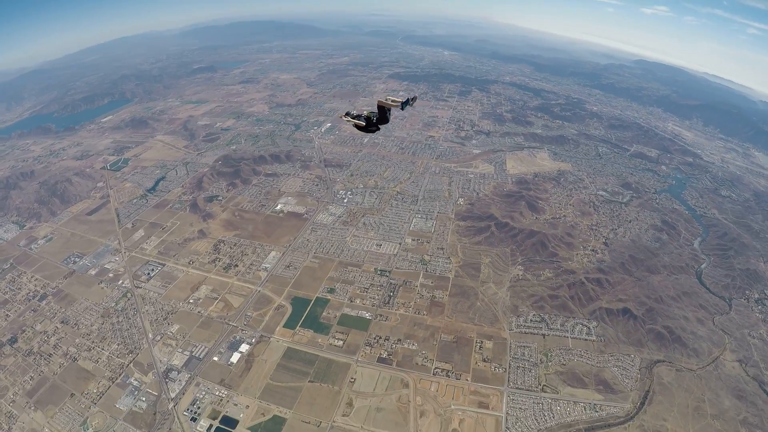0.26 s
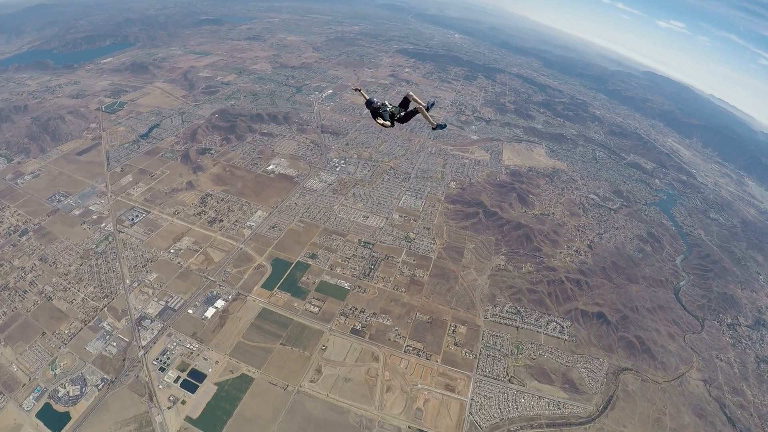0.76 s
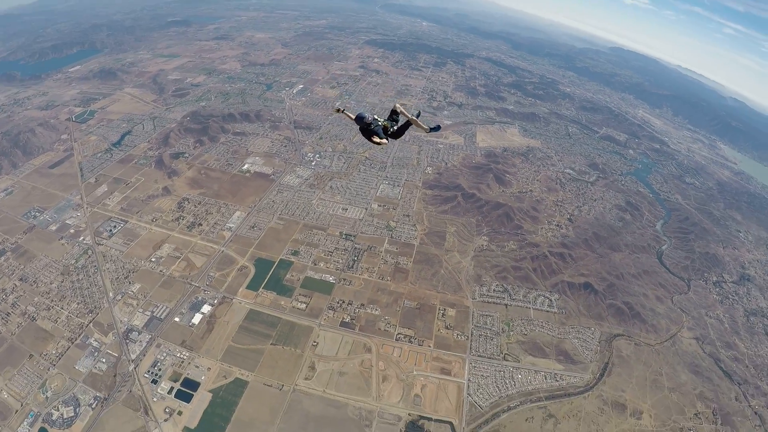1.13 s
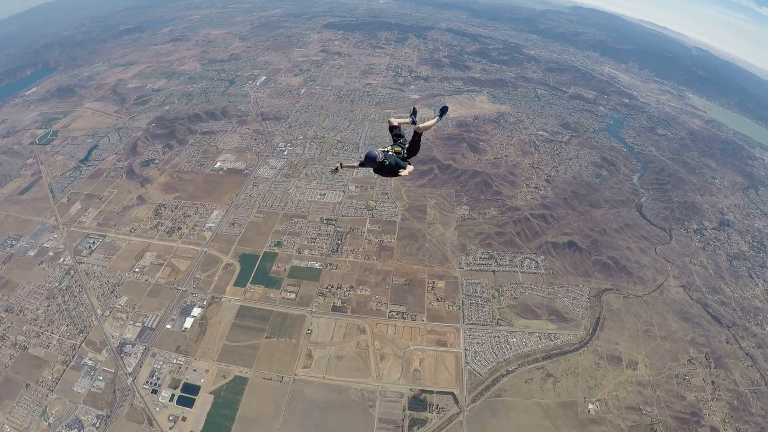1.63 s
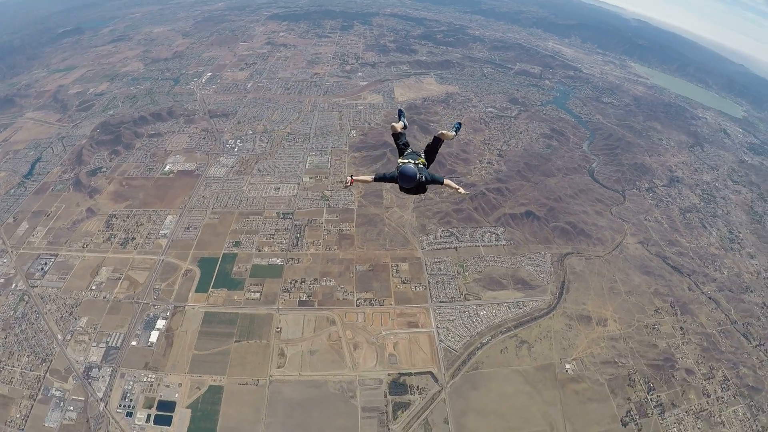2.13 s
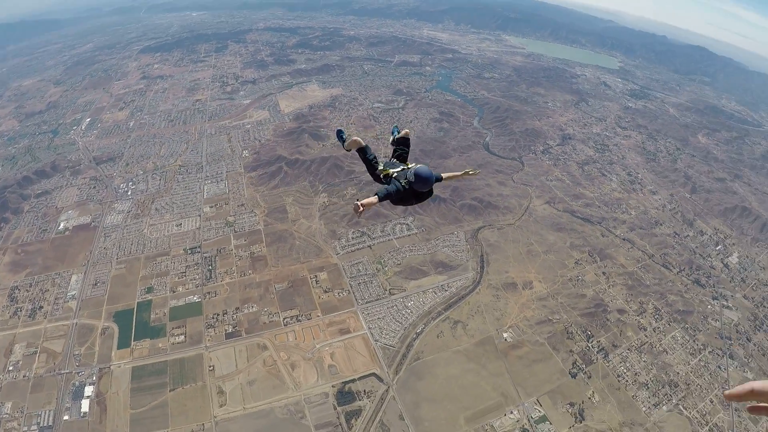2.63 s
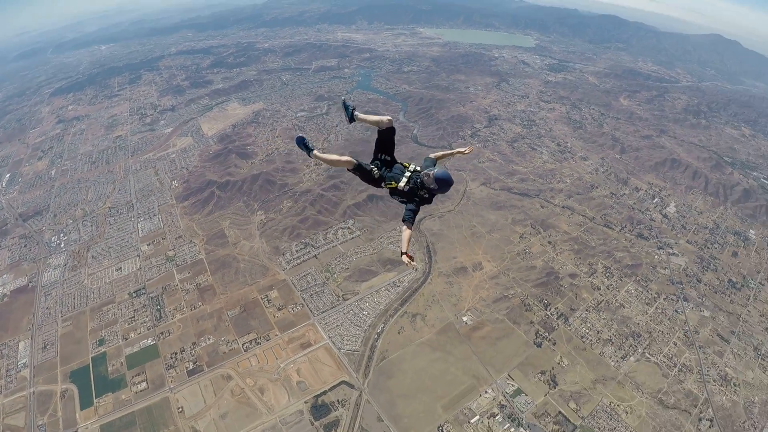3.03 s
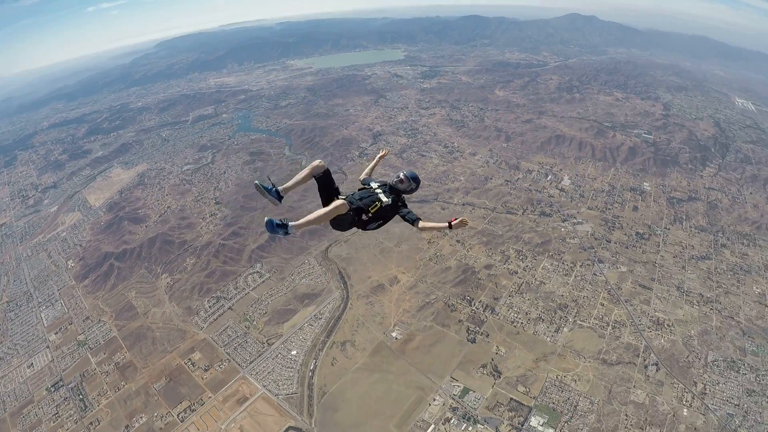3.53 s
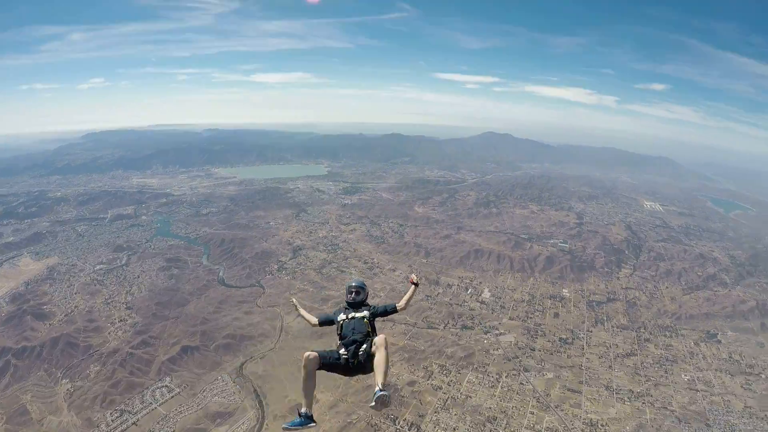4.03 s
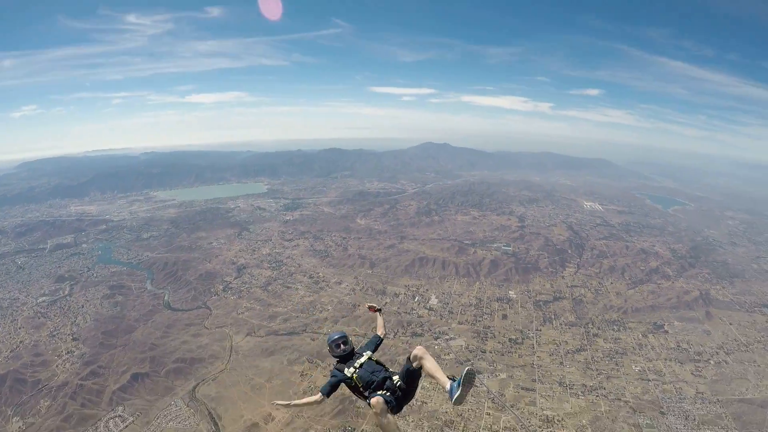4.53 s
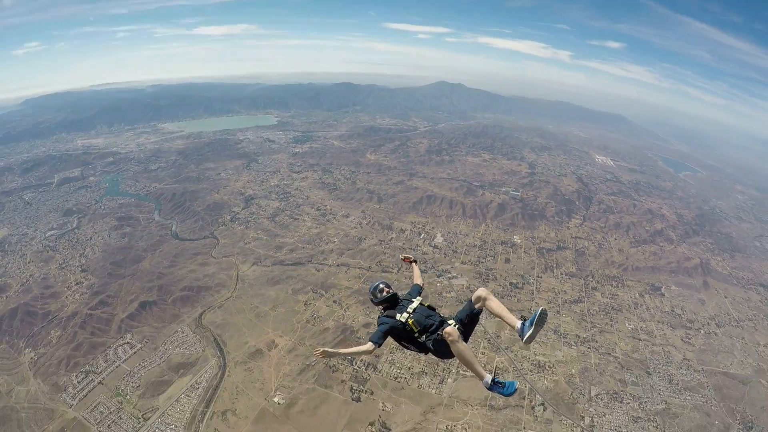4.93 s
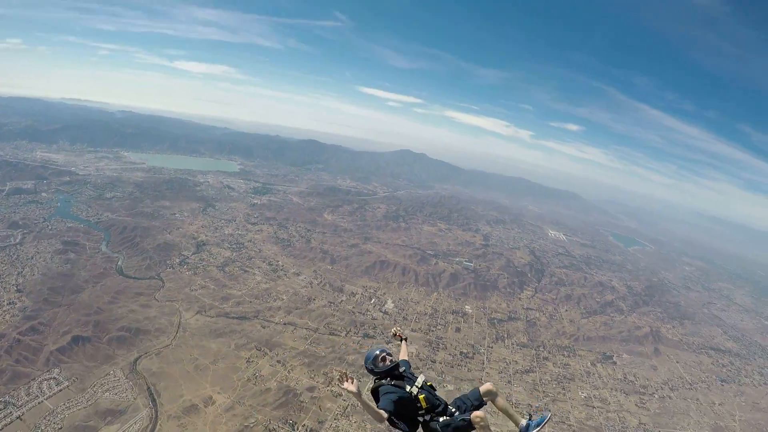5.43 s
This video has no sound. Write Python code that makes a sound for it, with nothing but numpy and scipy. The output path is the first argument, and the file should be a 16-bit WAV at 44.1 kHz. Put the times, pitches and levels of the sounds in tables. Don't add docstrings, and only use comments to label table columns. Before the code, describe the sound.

Freefall wind strikes a small helmet camera microphone at close range, in open sky with no reverberation. From 0 to 1.4 s a dense, steady rush swells over low buffeting, with airy hiss and a faint, unstable whistle around 0.5-1.4 s, nearly buried. From about 1.5 to 3.9 s the blast is fuller and rougher: thumping puffs, sharp little flicks, and rapid dry ticks of a loose strap end against the plastic housing, clustered most thickly around 1.7-2.9 s. Loudest swings sound squeezed and rounded. Near 4.0 s the roar suddenly collapses as the microphone turns out of the stream. A much quieter, duller low flutter remains, interrupted by short uneven gusts and tiny crackles from 4.2 s. Gusts strengthen around 4.9-5.3 s, with ragged gaps between them, then weaken to sparse soft puffs until the end at about 5.7 s.

```python
import sys
import numpy as np
from scipy import signal
from scipy.fft import rfft, irfft, next_fast_len
from scipy.io import wavfile
from scipy.ndimage import uniform_filter1d

SR = 44100
rng = np.random.default_rng(int(sys.argv[2]) if len(sys.argv) > 2 else 0)


def to_wav(sig):
    pcm = np.clip(np.atleast_2d(sig), -1, 1) * 32767
    pcm = np.round(pcm).astype(np.int16)
    wavfile.write(sys.argv[1], SR, pcm.T)


def ratio_of_db(decibels):
    return 10 ** (np.asarray(decibels, float) / 20)


N = 250471
TIME = np.arange(N) / SR
FAST = next_fast_len(N)
HZ = np.maximum(np.fft.rfftfreq(FAST, 1 / SR), 1)

# start in seconds, peak in dB, treble share in dB, length in seconds.
PUFFS_OPEN = [(1.561, -6, -28, 0.0041), (1.673, -9, -29, 0.006), (1.719, -7, -22, 0.0039),
              (2.196, -8, -19, 0.0032), (2.23, -10, -29, 0.0062), (2.642, -19, -26, 0.0024),
              (2.927, -19, -22, 0.0035), (3.07, -11, -32, 0.0046), (3.238, -10.5, -14, 0.012),
              (3.321, -22.5, -25, 0.0049), (3.378, -12, -13.5, 0.006), (3.458, -16.5, -23, 0.012),
              (3.499, -27, -23, 0.006), (3.649, -6, -19, 0.011), (3.793, -22, -26, 0.0026),
              (3.908, -7.5, -18, 0.0042)]
# start in seconds, peak in dB, treble share in dB, length in seconds.
PUFFS_LEE = [(4.208, -21.5, -25, 0.0026), (4.269, -26.5, -20, 0.0039), (4.293, -18, -18, 0.0049),
             (4.47, -18, -31, 0.0063), (4.492, -21.5, -28, 0.0071), (4.513, -11.5, -38, 0.0017),
             (4.568, -29, -24, 0.006), (4.64, -24.5, -22, 0.006), (4.664, -19.5, -29, 0.0044),
             (4.68, -28.5, -28, 0.0071), (4.74, -28, -12, 0.0076), (4.778, -11, -24, 0.0029),
             (4.822, -20, -28, 0.0041), (4.877, -19.5, -19, 0.0051), (4.909, -15.5, -12, 0.0031),
             (4.93, -12, -22, 0.0036), (4.97, -9, -31, 0.0046), (5.049, -13.5, -12, 0.0043),
             (5.086, -16, -32, 0.005), (5.148, -11.5, -32, 0.006), (5.173, -15.5, -21, 0.005),
             (5.216, -20.5, -23, 0.006), (5.237, -15.5, -17, 0.0073), (5.251, -7, -24, 0.0074),
             (5.307, -29.5, -30, 0.0044), (5.332, -16.5, -38, 0.0047), (5.373, -15, -33, 0.0041),
             (5.466, -22, -22, 0.0072), (5.542, -28.5, -24, 0.006), (5.614, -22, -28, 0.0087)]


def unit(x):
    return x / np.sqrt(np.mean(x ** 2))


def curves(table):
    s, *columns = np.transpose(table)
    return [np.interp(TIME, s, c) for c in columns]


def between(apart, attached, separated):
    return attached + (separated - attached) * apart


def colour(x, spectrum):
    hz, db = np.transpose(spectrum)
    gain = ratio_of_db(np.interp(np.log(HZ), np.log(hz), db, right=-150))
    return irfft(rfft(x, FAST) * gain, FAST)[:N]


def passed(x, spectrum):
    click = colour(np.arange(N) == 0, spectrum)
    return colour(x, spectrum) / np.sqrt(np.sum(click ** 2))


def walk(rate_hz):
    k = max(int(SR / rate_hz), 2)
    held = rng.standard_normal(4000)[np.arange(N) // k % 4000]
    return unit(uniform_filter1d(uniform_filter1d(held, k), k))


def bells(times_s, db, halves_s):
    coarse = TIME[::32]
    total = sum(d * np.exp(-((coarse - s) / half) ** 2) for s, d, half in zip(times_s, db, halves_s))
    return np.interp(TIME, coarse, total)


def bursts(times_s, db, lengths_s, rise):
    out = np.zeros(N)
    for s, peak_db, length_s in zip(times_s, db, lengths_s):
        i = int(s * SR)
        t = TIME[:min(int(.08 * SR), N - i)] / length_s
        out[i:i + len(t)] += ratio_of_db(peak_db) * (1 - np.exp(-t / rise)) * np.exp(-t ** 2)
    return out


def grain(s, half_s):
    i = np.arange(max(int((s - .012) * SR), 0), min(int((s + .012) * SR), N))
    t = i / SR - s
    return i, t, np.exp(-(t / half_s) ** 2)


def turbulence(spectrum, shared_db, own_db, rate_hz, tilt_db=0., pivot_hz=1000, bend_db=0.):
    whole = rfft(unit(colour(rng.standard_normal(N), spectrum)), FAST)
    half_octave = 2 * np.log2(HZ)
    first, last = (int(2 * np.log2(spectrum[k][0])) for k in (0, -1))
    out = 0
    for step in range(first, last + 2):
        window = np.cos(np.pi / 2 * np.clip(half_octave - step, -1, 1)) ** 2
        piece = irfft(whole * window, FAST)[:N]
        away = step / 2 - np.log2(pivot_hz)
        out = out + piece * ratio_of_db(own_db * walk(rate_hz) + tilt_db * away + bend_db * away ** 2)
    return out * ratio_of_db(shared_db)


def head():
    # time in seconds, exposure in dB, flow separation 0-1, wake strength in dB.
    attitude = [(0, -26.5, 0, 0), (.1, -27, 0.1, -11.5), (.4, -25, 0, -15), (.85, -22.5, 0.05, -17.5),
                (1.4, -19.5, 0.22, -14), (1.7, -21.5, 0.34, -11.5), (2.0, -21, 0.37, -17),
                (2.5, -20.5, 0.34, -12.5), (3.1, -21, 0.2, -11.5), (3.75, -22.5, 0.47, -10),
                (4.0, -29, 0.65, -19), (4.04, -42.5, 0.94, -29.5), (4.18, -43.5, 0.94, -19),
                (4.3, -41.5, 0.94, -23), (4.6, -44, 1, -24.5), (5.0, -29, .8, -14.5),
                (5.3, -35.5, 0.9, -17), (5.5, -46.5, 0.97, -21)]
    exposure_db, apart, wake_db = curves(attitude)
    return exposure_db, np.clip(apart, 0, 1), wake_db


def gusts():
    # centre in seconds, change of exposure in dB, half length in seconds.
    swells = [(1.525, -2.5, 0.027), (1.721, -5, 0.013), (1.799, 5, 0.031), (1.931, 3.5, 0.01),
              (3.62, -3, 0.045), (3.812, -7, 0.023), (4.233, 11.5, 0.026), (4.3, 4, .02), (4.46, 3.5, .06),
              (4.312, 2, .006), (1.615, -1, 0.054), (5.026, 5, 0.016), (5.3, -1, .03), (4.33, 2, 0.0045),
              (4.364, 5, 0.0055), (4.414, 6.5, 0.018), (4.586, 8, 0.0045), (4.619, 6.5, .008),
              (4.68, 13.5, 0.0093), (4.78, 7, 0.0085), (4.837, 10, 0.01), (4.911, 12, 0.021),
              (4.968, 10, 0.0088), (5.076, 10, 0.031), (5.118, 8, 0.0076), (5.173, -24, 0.0071),
              (5.192, 11, 0.011), (5.253, 9, 0.032), (5.359, 9.5, 0.024), (5.42, 8, 0.0046),
              (5.484, 12, 0.0058), (5.569, 12, 0.013), (5.583, 10.5, 0.0047), (5.631, 5, 0.0065),
              (5.68, 16.5, 0.02)]
    # centre in seconds, change of exposure in dB.
    gaps = [(3.96, -5), (4.035, -14), (4.047, -5), (4.077, -8), (4.126, -11), (4.174, -3), (4.306, -3),
            (4.462, -1), (4.658, -1), (4.927, -4), (5.166, -5), (5.212, -4), (5.299, -7), (5.527, -4),
            (4.54, 1), (4.625, 0), (4.71, -8), (4.805, -7), (4.855, -8), (4.896, -11), (4.947, 0),
            (4.99, -6), (5.035, -4), (5.1, -3), (5.135, -10), (5.222, -2), (5.29, 0), (5.315, 1),
            (5.405, 7), (5.45, -7), (5.505, -1), (5.603, -5), (5.65, -0.5)]
    short = [(s, db, 0.0055) for s, db in gaps]
    lulls = [(s - .0045, -2.5, 0.003) for s, *_ in PUFFS_OPEN + PUFFS_LEE]
    return bells(*np.transpose(swells + short + lulls))


def flutter(apart):
    return between(apart, .5, 4) * 1.76 * np.tanh(unit(0.096 * walk(70) + walk(200)) / 1.97)


def buffet(wake_db, gust_db, flutter_db, apart):
    # frequency in Hz, level in dB per Hz.
    slow_colour = [(15, -36), (25, -12), (50, 0), (90, 1.5), (125, 4), (160, -3.5), (220, -24),
                   (300, -75.5)]
    # frequency in Hz, level in dB per Hz.
    quick_colour = [(90, -45), (130, -7.5), (180, 0.5), (240, -4), (320, -8.5), (420, -18.5), (560, -28.5),
                    (800, -36)]
    # centre in seconds, change of slow buffet in dB,
    # change of quick buffet in dB, half length in seconds.
    vortices = [(0.016, -1.5, -14.5, 0.027), (0.493, 1, -0.5, 0.065), (1.167, -1.5, -2.5, 0.082),
                (1.647, 5, -4, .02), (1.772, 6.5, -4, 0.041), (1.933, 3, 3, 0.055), (2.498, -4, -1.5, 0.11),
                (2.775, 3.5, -2.5, 0.075), (2.852, -6, -6, 0.014), (3.067, -3.5, -3.5, 0.029),
                (3.6, -2, 0, 0.066), (3.731, 6, 0.5, 0.022), (3.785, 0.5, 2.5, 0.031), (3.994, 5, 8, 0.062),
                (4.112, -4, -2.5, 0.077), (4.258, 0.5, -0.5, 0.057), (4.5, 4.5, 5, 0.029),
                (4.559, -5, -5, 0.032), (4.723, -7, 0, 0.03), (4.753, 13, 7.5, 0.013),
                (4.841, 5.5, 2, 0.011), (5.11, 0.5, 1.5, 0.016), (5.162, -1.5, 10.5, 0.049),
                (5.315, 3.5, 9.5, 0.026), (5.64, -9.5, -8, 0.024)]
    # time in seconds, lean of quick buffet in dB per octave.
    eddy_size = [(0, 2.5), (.3, 0), (.7, -3), (1.0, -3), (1.3, -6.5), (1.6, 4.5), (1.9, -1), (2.2, 0.5),
                 (2.6, -1.5), (3.0, 3), (3.3, 2.5), (3.55, 3), (3.8, 7), (4.0, 0), (4.4, -0.5), (4.8, -1.5),
                 (5.2, 1.5), (5.68, -6)]
    at_s, slow_swell_db, quick_swell_db, half_s = np.transpose(vortices)
    wake_db = wake_db + 0.42 * gust_db
    slow_db = -12.5 + 0.082 * (wake_db + 10.0) + bells(at_s, slow_swell_db, half_s)
    quick_db = wake_db + bells(at_s, quick_swell_db, half_s)
    slow = ratio_of_db(slow_db) * turbulence(slow_colour, -.15 * flutter_db, 0.43, 4.7)
    tilt_db = between(apart, -1, 1.5) + curves(eddy_size)[0]
    quick = ratio_of_db(quick_db) * turbulence(quick_colour, 0.46 * flutter_db, 0.94, 28, tilt_db, 230)
    return slow + quick


def rush(level_db, flutter_db, apart):
    # frequency in Hz, level in dB per Hz.
    rush_colour = [(200, -47), (350, 0), (500, -0.5), (700, -3), (1200, -5), (1800, -11), (2600, -17.5),
                   (3200, -24.5), (4200, -37), (6000, -39)]
    tilt_db = between(apart, 2.5, -5)
    return ratio_of_db(level_db - 0.5) * turbulence(rush_colour, flutter_db, 0.82, 45, tilt_db, 1160)


def hiss(exposure_db, gust_db, flutter_db, apart):
    # frequency in Hz, level in dB per Hz.
    hiss_colour = [(2500, -28.5), (3400, -3.5), (4100, 1.5), (4600, 2), (5400, 0), (6600, -1.5),
                   (7400, -5.5), (8500, -13.5), (10000, -15), (11200, -24), (12200, -30), (14500, -39.5),
                   (15500, -55.5)]
    level_db = exposure_db + between(apart, -12, -21) + 0.73 * gust_db
    shared_db = between(apart, 0.31, 0.7) * flutter_db + 0.36 * walk(40)
    tilt_db = between(apart, -2.5, 3)
    bend_db = between(apart, -2.5, -3)
    return ratio_of_db(level_db) * turbulence(hiss_colour, shared_db, 0.79, 39.98, tilt_db, 5500, bend_db)


def puffs():
    # frequency in Hz, level in dB.
    body_colour = [(200, -18), (400, 5), (600, 2), (1000, -6.5), (1600, -13.5), (2400, -22.5), (3200, -36),
                   (4500, -31.5), (6000, -54)]
    # frequency in Hz, level in dB.
    spray_colour = [(1500, -24), (2300, 2), (3300, -0.5), (4600, -2.5), (6600, -9), (8500, -5.5),
                    (10000, -29), (11000, -39), (13000, -72)]
    s, db, treble_db, length_s = np.transpose(PUFFS_OPEN + PUFFS_LEE)
    body = bursts(s, db - 7.0, length_s, 0.049) * rng.standard_normal(N)
    spray = bursts(s, db + treble_db - 7.5, 1.1 * length_s, 0.25) * rng.standard_normal(N)
    return passed(body, body_colour) + passed(spray, spray_colour)


def flicks():
    # centre in seconds, peak in dB, half length in seconds.
    clear = [(0.5822, -19, 0.0032), (1.4203, -15, 0.0016), (1.8518, -17, 0.0023), (2.0563, -24, 0.0014),
             (2.2297, -10.5, 0.0026), (2.3404, -11, 0.00089), (2.5604, -9.5, 0.00081),
             (2.5829, -11.5, 0.0013), (2.6238, -25, 0.0018), (2.6455, -21, 0.0026), (2.6941, -22, 0.0019),
             (3.1237, -10, 0.0011), (3.1788, -17, 0.0022), (3.2913, -16, 0.0014), (3.3207, -13, 0.0011),
             (3.3838, -11, 0.00099), (3.4669, -14, 0.0012), (3.6143, -18, 0.0012), (3.6694, -12, 0.0013),
             (3.8445, -20.5, 0.0012), (3.8794, -18, 0.0014), (3.9458, -21, 0.0015), (4.2271, -24, 0.0011),
             (4.27, -30, 0.0015), (4.3142, -27.5, 0.001), (4.3391, -40, 0.0017), (4.3683, -31, 0.001),
             (4.4332, -36, 0.0014), (4.4751, -29, 0.0011), (4.5759, -34, 0.0011), (4.5866, -34, 0.0014),
             (4.6444, -29, 0.0017), (4.6826, -23, 0.0012), (4.7051, -38, 0.0021), (4.7709, -25, 0.0026),
             (4.7874, -24, 0.00096), (4.8325, -28, 0.0029), (4.8457, -27, 0.0016), (4.8759, -31, 0.0025),
             (4.8909, -22.5, 0.0033), (4.9186, -19, 0.002), (5.0034, -24, 0.0012), (5.078, -15.5, 0.0017),
             (5.0937, -19, 0.0011), (5.1974, -22, 0.0024), (5.2363, -16, 0.0011), (5.2763, -28, 0.0025),
             (5.2862, -25, 0.0014), (5.3249, -21.5, 0.00093), (5.3396, -19, 0.00064), (5.3942, -29, 0.0015),
             (5.4194, -31, 0.0015), (5.4504, -39, 0.0017), (5.5569, -38, 0.0024), (5.5806, -42, 0.0013),
             (5.6285, -38, 0.0014), (5.6669, -34, 0.0021)]
    # centre in seconds, peak in dB, half length in
    # seconds.
    more_lee = [(4.136, -45, 0.0015), (4.158, -44, 0.0015), (4.193, -38, 0.0015), (4.224, -29, 0.0015),
                (4.2493, -38, 0.0015), (4.327, -36.5, 0.0015), (4.335, -36, 0.0015), (4.352, -40, 0.0015),
                (4.3945, -37, 0.0015), (4.49, -40, 0.0015), (4.5379, -39, 0.0015), (4.56, -41, 0.0015),
                (4.567, -38, 0.0015), (4.612, -39, 0.0015), (4.704, -37, 0.0015), (4.742, -29, 0.001),
                (4.409, -31, 0.001), (4.85, -31.5, 0.0015), (4.872, -29, 0.0015), (4.878, -22.5, 0.0015),
                (4.929, -21, 0.0015), (5.001, -19, 0.0015), (5.134, -35, 0.0015), (5.149, -22, 0.001),
                (5.26, -22, 0.0012), (5.3725, -21.5, 0.00074), (4.513, -26.5, 0.001), (5.477, -30, 0.0015),
                (5.558, -35, 0.0015), (5.566, -40, 0.0015), (5.67, -34, 0.0015)]
    # frequency in Hz, level in dB.
    crackle = [(300, -26.5), (600, -8), (1200, 5.5), (2200, -3.5), (3200, -12.5), (4500, -15), (7000, -27)]
    rows = clear + more_lee
    snap, swell = np.zeros(N), np.zeros(N)
    for (s, db, half_s), (pitch, phase) in zip(rows, rng.standard_normal((len(rows), 2))):
        i, t, bell = grain(s, 0.00024)
        hz = 1400 * np.exp(0.21 * pitch)
        snap[i] += ratio_of_db(db + 4.5) * bell * np.cos(2 * np.pi * (hz * t + phase))
        swell[i] += ratio_of_db(db - 7.5) * np.exp(-(t / (0.71 * half_s)) ** 2)
    return colour(snap, crackle) + swell * unit(colour(rng.standard_normal(N), crackle))


def ticks():
    # time in seconds, rattle in dB.
    strap = [(0, -49), (.25, -61), (.45, -63), (1.3, -58), (2.0, -48), (2.6, -49), (3.9, -48), (4.1, -60.5),
             (4.65, -59), (5.05, -50), (5.68, -59)]
    # time in seconds, peak in dB, centre in Hz.
    ticks_open = [(1.7445, -25, 5800), (1.7478, -29, 5900), (1.7523, -23, 5800), (1.8096, -26, 6250),
                  (1.8126, -23, 5300), (1.8378, -23, 6200), (1.8408, -25, 6260), (1.8456, -20, 4960),
                  (1.8795, -23, 6370), (1.9383, -31, 5600), (1.9623, -26, 6200), (1.97, -26, 6030),
                  (2.0002, -22, 5450), (2.0064, -26, 5360), (2.0411, -18, 5700), (2.0506, -27.5, 5450),
                  (2.0648, -27, 5900), (2.0893, -18, 5200), (2.1037, -29, 6200), (2.11, -20, 6350),
                  (2.1938, -25, 5900), (2.1973, -31, 5500), (2.2087, -26, 5600), (2.2711, -31, 5900),
                  (2.304, -21, 5200), (2.3105, -19, 5900), (2.3993, -25, 6400), (2.4035, -26.5, 5260),
                  (2.5215, -25, 6070), (2.5717, -36, 5600), (2.5809, -32, 6560), (2.7355, -22, 5400),
                  (2.7495, -22, 5340), (2.8168, -20, 5500), (2.8326, -27, 5550), (2.8488, -26, 6300),
                  (2.8595, -24, 5900), (2.8657, -26, 5600), (3.0264, -24, 5300), (3.0391, -22, 5700),
                  (3.0506, -21, 6400), (3.1374, -24.5, 5700), (3.1541, -28, 5900), (3.2037, -22, 6000),
                  (3.2154, -26, 5600), (3.4112, -26, 6100), (3.42, -24, 5800), (3.4838, -34, 6000),
                  (3.5123, -26, 5800), (3.5681, -35, 5600), (3.6063, -31, 5500), (3.6544, -31, 5400),
                  (3.6604, -32, 5700), (3.73, -36, 6200), (3.7572, -26, 5200), (3.843, -34, 6000),
                  (3.9518, -41, 6300), (4.0037, -39, 6100), (4.0069, -23.5, 5800), (4.0109, -30, 6100)]
    # time in seconds, peak in dB, centre in Hz.
    ticks_lee = [(4.054, -43, 6200), (4.1049, -48, 6000), (4.201, -44, 6000), (4.2132, -42, 6000),
                 (4.253, -35, 6000), (4.267, -32, 5800), (4.282, -35, 6200), (4.3376, -39, 5700),
                 (4.3406, -38, 6000), (4.3588, -43.5, 6200), (4.3633, -36, 6100), (4.3945, -42, 5100),
                 (4.4062, -47, 6000), (4.4095, -48, 5200), (4.4736, -48, 5900), (4.4803, -43, 6130),
                 (4.4846, -43, 6160), (4.4878, -46, 5900), (4.4948, -45, 5900), (4.518, -42, 5800),
                 (4.6032, -33.5, 5730), (4.611, -43, 5900), (4.6424, -44, 6000), (4.6459, -45, 5300),
                 (4.6522, -43, 5600), (4.6824, -40, 5100), (4.6918, -44, 5900), (4.741, -34, 5100),
                 (4.7716, -31, 5800), (4.7771, -32, 6000), (4.7835, -34, 5900), (4.8313, -36, 5900),
                 (4.8457, -37, 5400), (4.9093, -42, 6000), (4.9133, -36, 6200), (4.9203, -34, 6240),
                 (4.9271, -36, 5700), (4.9695, -35, 5000), (5.062, -35, 5800), (5.0657, -30, 5800),
                 (5.0687, -35, 5700), (5.0742, -37, 5300), (5.0844, -39, 5500), (5.1219, -39, 5800),
                 (5.1907, -34, 6000), (5.2084, -34, 5700), (5.2496, -31, 5430), (5.2533, -33, 5900),
                 (5.2598, -36, 5900), (5.2693, -36, 5700), (5.4107, -48, 5700), (5.4539, -45, 6000),
                 (5.482, -38, 5630), (5.5581, -47, 5900), (5.5641, -47, 5700), (5.5763, -50, 5700),
                 (5.5801, -42, 5900), (5.5848, -49, 6200), (5.615, -46, 6100), (5.6185, -47, 6000)]
    # frequency in Hz, level in dB.
    shell = [(3900, -43), (4300, -7), (4500, -5.5), (4800, 1), (5500, -3.5), (6800, -2.5), (8000, -7),
             (9400, -12.5), (10200, -34), (12000, -66.5)]
    housing_hz, housing_t60_s, housing_db = 4570, 0.029, -9
    snap_s, scrape_s = 0.000097, 0.002
    scrape_db = narrow_db = -13.5
    scrape = rng.standard_normal(N)
    out = scrape * ratio_of_db(curves(strap)[0] + 9.3 * np.tanh(0.31 * walk(300) + 0.17 * walk(64)))
    rows = ticks_open + ticks_lee
    grit = walk(2200)[np.arange(N) % 40000]
    for (s, db, hz), phase in zip(rows, rng.random(len(rows))):
        i, t, bell = grain(s, snap_s)
        around = np.exp(-(t / scrape_s) ** 2)
        narrow = (bell + ratio_of_db(narrow_db) * around * grit[i]) * np.cos(2 * np.pi * (hz * t + phase))
        out[i] += ratio_of_db(db + 1.1) * (narrow + ratio_of_db(scrape_db) * around * scrape[i])
    width_hz = np.log(1000) / (np.pi * housing_t60_s)
    ring = signal.lfilter(*signal.iirpeak(housing_hz, housing_hz / width_hz, fs=SR), out)
    return ratio_of_db(8.5) * colour(out + ratio_of_db(housing_db) * ring, shell)


def edge_tone():
    # time in seconds, pitch in Hz, level in dB.
    whistle = [
        (0, 1105, -67),
        (.45, 1100, -36),
        (.7, 1160, -31),
        (.95, 1140, -27.5),
        (1.12, 1060, -30.5),
        (1.25, 1166, -25.5),
        (1.5, 1210, -75),
        (3, 1317, -31),
        (4, 1294, -67),
    ]
    hz, db = curves(whistle)
    phase = 2 * np.pi * np.cumsum(hz * (1 + .045 * walk(40) + 0.0097 * walk(5))) / SR
    return ratio_of_db(db - 0.5) * (walk(230) * np.cos(phase) + walk(230) * np.sin(phase))


def specks():
    # time in seconds, peak in dB.
    high_clicks = [(1.1623, -51), (2.2473, -54), (2.582, -52), (3.3553, -58), (4.0901, -74), (4.4089, -67),
                   (4.5106, -66), (4.7341, -68), (5.5288, -69)]
    out = np.zeros(N)
    for s, db in high_clicks:
        i, t, bell = grain(s, .00012)
        out[i] += ratio_of_db(max(db, -62)) * bell * np.cos(2 * np.pi * 13000 * t)
    return out


def scene():
    exposure_db, apart, wake_db = head()
    gust_db = gusts()
    flutter_db = flutter(apart)
    out = buffet(wake_db, gust_db, flutter_db, apart)
    out = out + rush(exposure_db + gust_db, flutter_db, apart)
    out = out + hiss(exposure_db, gust_db, flutter_db, apart)
    out = out + puffs() + flicks() + ticks() + edge_tone() + specks()
    return out[None]


def band_limit(x):
    return signal.sosfilt(signal.butter(12, 15600, fs=SR, output="sos"), x)


def record(dry):
    ceiling, drive_db, treble_hz = .96, 1, 16600
    swing = uniform_filter1d(np.abs(dry), int(0.015 * SR), axis=1)
    swing = uniform_filter1d(swing, int(0.00071 * SR), axis=1)
    held = dry * ratio_of_db(drive_db) / (1 + (swing / 0.41) ** 3) ** 0.39
    rounded = held / (1 + np.abs(held / ceiling) ** 6) ** (1 / 6)
    fade_in = np.clip(TIME / .003, 0, 1)
    dulled = signal.sosfilt(signal.butter(2, treble_hz, fs=SR, output="sos"), rounded * fade_in)
    return band_limit(dulled)


dry = scene()
out = record(dry)
to_wav(out)
```